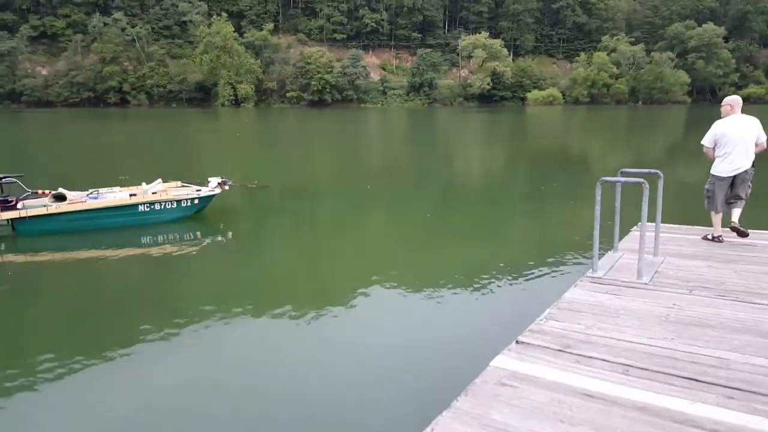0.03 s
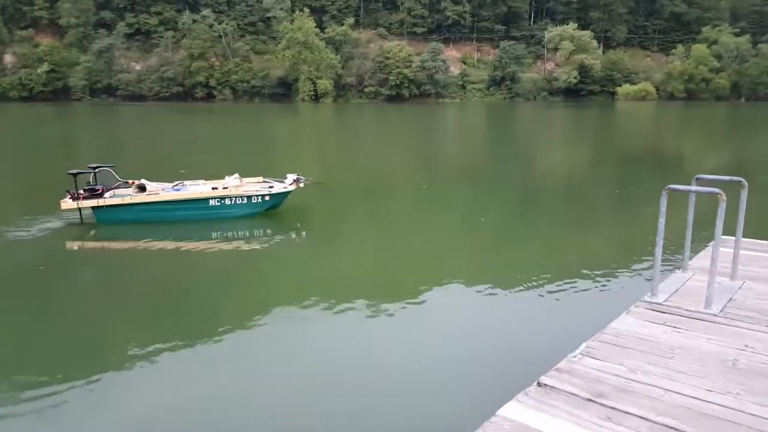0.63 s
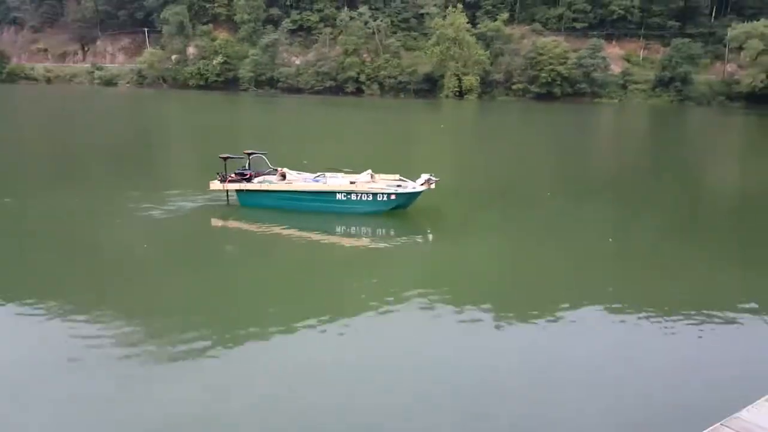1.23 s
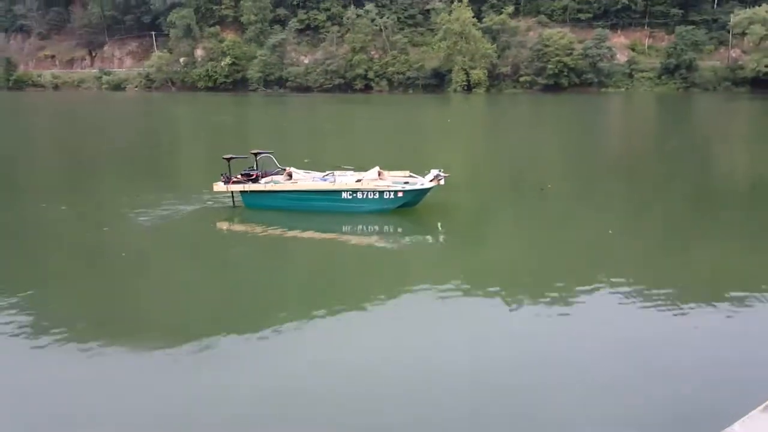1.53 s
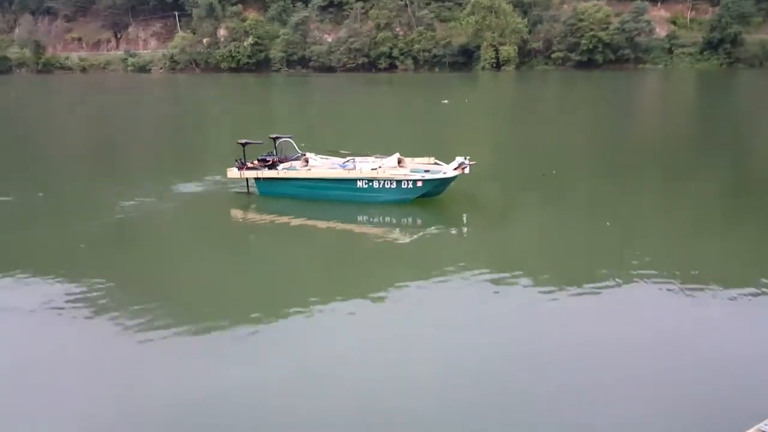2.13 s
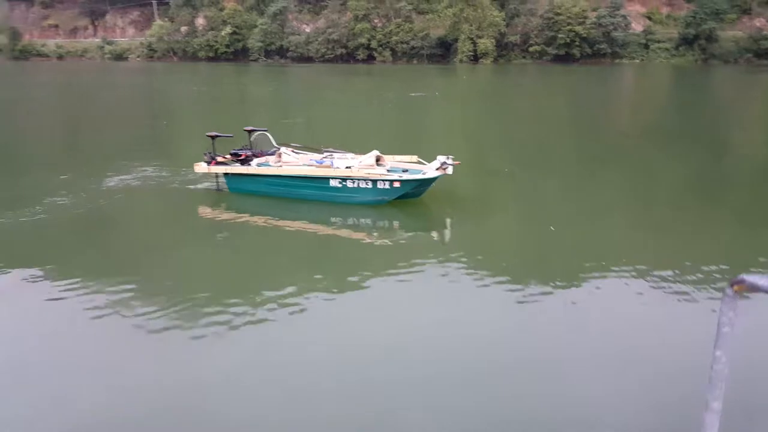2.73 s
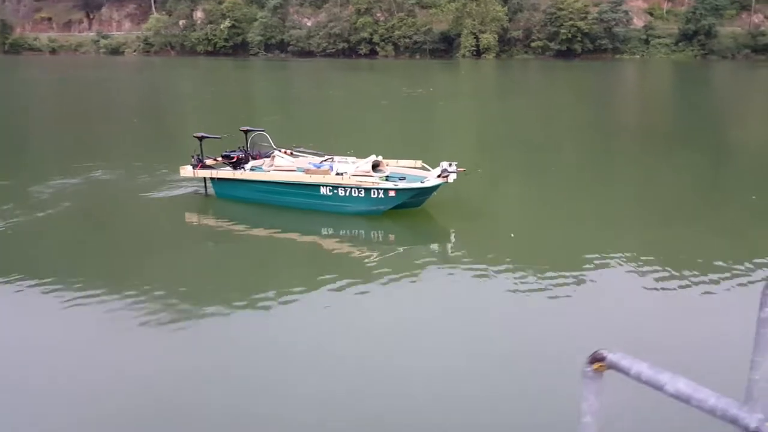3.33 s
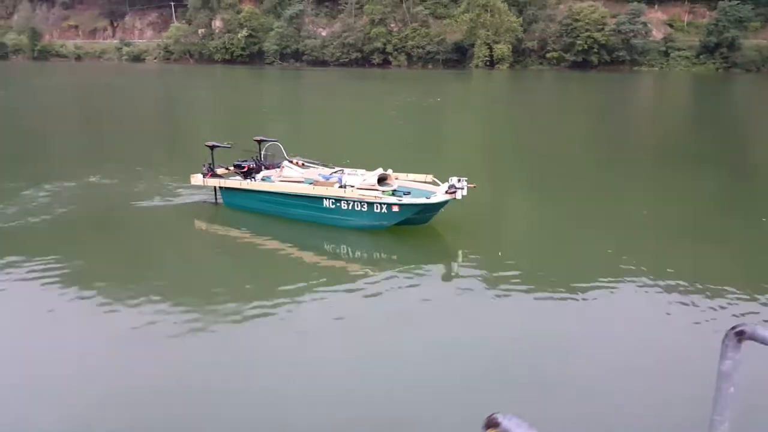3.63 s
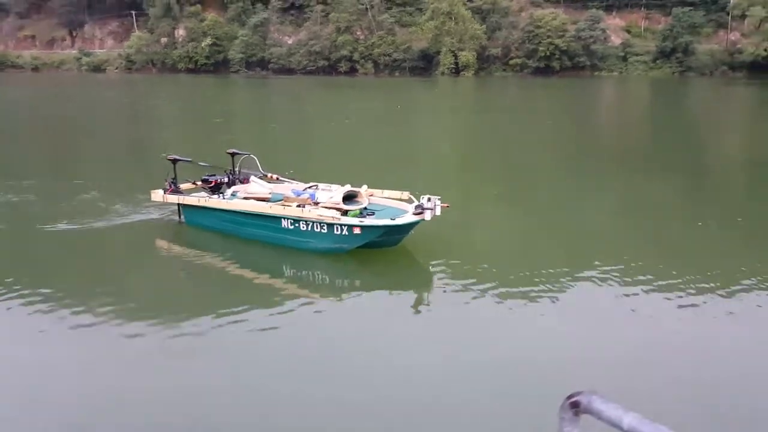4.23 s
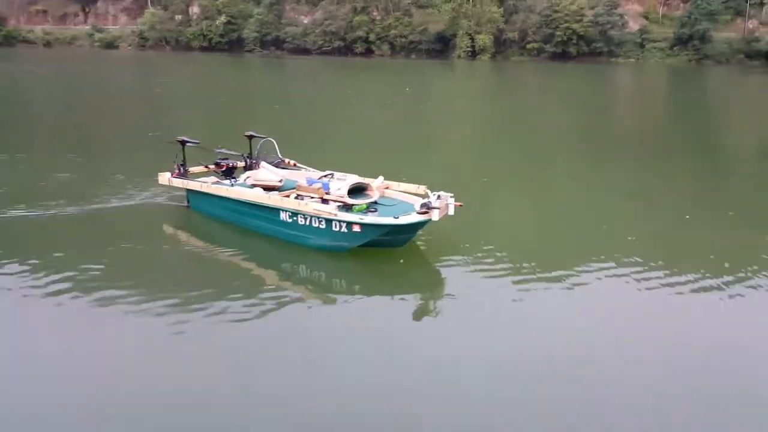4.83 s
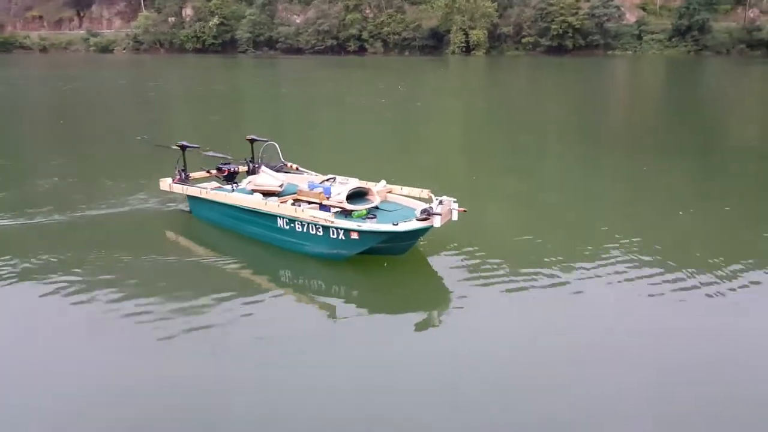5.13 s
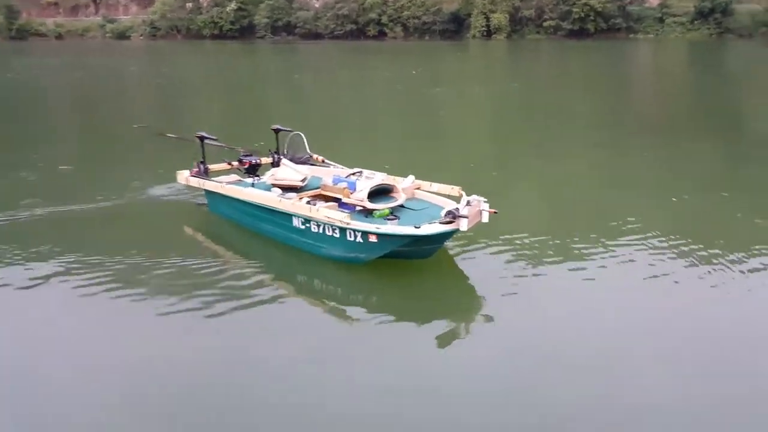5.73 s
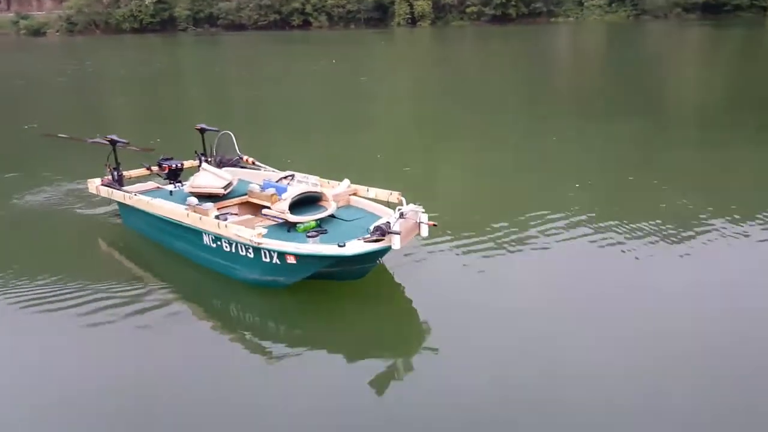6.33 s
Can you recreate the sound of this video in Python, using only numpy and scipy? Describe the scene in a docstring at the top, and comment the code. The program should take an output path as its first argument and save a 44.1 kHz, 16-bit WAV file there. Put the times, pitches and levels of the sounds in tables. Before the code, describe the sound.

Close, uneven thuds and shoe scuffs on dock planks, while far birds twitter faintly in calm lakeside air.

```python
"""Footsteps and knocks, close by, on the planks of a wooden dock beside a calm lake.
Each blow bends a plank (a hollow thud), rings its higher modes (a woody clack) and cracks at the
contact; soles scuff and grit ticks in between. Out on the water a small electric boat hums past.
Far off a bird whistles twice, an insect chirps, and faint twitter and very high chips run through
the outdoor hush. Heard on a stereo pair whose left microphone has more presence."""
import sys
import numpy as np
from scipy import signal
from scipy.fft import rfft, irfft, next_fast_len
from scipy.io import wavfile
from scipy.ndimage import uniform_filter1d

SR = 44100
rng = np.random.default_rng(int(sys.argv[2]) if len(sys.argv) > 2 else 0)


def store_pcm(level_fs):
    """Save levels as 16-bit WAV."""
    pcm = np.round(np.clip(level_fs, -1, 1) * 32767).astype(np.int16)
    wavfile.write(sys.argv[1], SR, np.atleast_2d(pcm).T)


N = 286209
TIME = np.arange(N) / SR
AGE = np.arange(SR // 4) / SR  # seconds since a blow

# Blows on the planks, close by: start_s, strength_db, pitch_hz (of the struck spot), hardness_db
BLOWS = [(0.097, -36, 297, -8), (0.196, -52.5, 353, -20), (0.2559, -46.5, 330, -27),
         (0.3409, -35.5, 255, -11.5), (0.665, -53, 269, -21), (0.755, -59, 296, -5), (0.868, -58, 472, -13),
         (1.066, -48, 302, -12.5), (1.4844, -53, 215, -17), (1.836, -62, 222, 4), (1.908, -62.5, 366, 0.5),
         (2.304, -63.5, 270, -6), (2.507, -60, 520, -34), (2.643, -67, 302, 0), (2.792, -25.5, 345, -4.5),
         (2.848, -45, 288, -17), (3.062, -56, 200, -36), (3.4215, -60, 222, 7), (3.854, -49.5, 443, -10),
         (3.935, -58.5, 378, -8), (4.221, -58.5, 206, 1), (4.306, -64, 330, -2), (4.7216, -56, 288, -8),
         (5.041, -58.5, 330, -17), (5.48, -40.5, 331, -10), (5.563, -56.5, 265, -19),
         (5.763, -45, 327, -11.5), (5.7924, -35, 349, -5), (5.842, -52, 237, -14), (5.91, -53.5, 350, -15),
         (6.1748, -55, 435, -3), (6.207, -54.5, 275, -12), (6.239, -57.5, 272, -7), (6.327, -54, 221, -7)]
# The cracks start on the left and move rightward: time_s, left_minus_right_db
CRACK_PAN = [(0, 3), (3, 2), (5.8, -2)]


def footsteps(plank_hz=308, light_tap_db=-51):
    """Each blow on the dock sounds as a thud, a clack and a crack together."""
    starts, strength_db, pitch_hz, hardness_db = np.transpose(BLOWS)[:, :, None]
    stiffness = np.log2(pitch_hz / plank_hz)
    # stiff spots and hard contacts clack more; heavy blows go more into the thud
    clack_db = -7 + 15.5 * stiffness + 0.29 * hardness_db - 0.15 * (strength_db - light_tap_db)
    sharpness_db = strength_db + hardness_db - np.max(strength_db + hardness_db)  # 0 for the sharpest
    pan_db = np.interp(starts, *np.transpose(CRACK_PAN))
    thuds = plank_thuds(pitch_hz)
    clacks = from_db(clack_db) * plank_clacks(832 * 2 ** (0.24 * stiffness))
    cracks = from_db(hardness_db - 3.5) * contact_cracks(hardness_db, sharpness_db)
    blows = from_db(strength_db) * (thuds + clacks + cracks * from_db([pan_db / 2, -pan_db / 2]))
    out = np.zeros((2, N))
    for k, start in enumerate(starts[:, 0]):
        add(out, start, blows[:, k])
    return out


def plank_thuds(pitch_hz, echo_s=0.015, echo_db=-10, frame_db=-14):
    """The plank gives way in a few swings of sinking pitch and rings on; the frame rumbles after it."""
    cycles = pitch_hz * (AGE + 0.0025 * (1 - np.exp(-AGE / 0.0065)))
    give = unit_blow(np.sin(2 * np.pi * cycles) * decay(t60=0.019, rise=0.004))
    modes = deck_ring(0, 550, pitch_hz, octaves=0.56, rise_cycles=0.99)
    boards = dense_ring(len(BLOWS), 106, 680, t60=0.043, rise=0.00033)
    thuds = unit_blow(modes + 0.43 * give + 0.41 * boards)
    # the bending wave comes back once from the end of the plank
    echo = np.pad(thuds, [(0, 0), (round(echo_s * SR), 0)])[:, :len(AGE)]
    frame = dense_ring(len(BLOWS), 97, 255, t60=0.2, rise=0.018, order=3)
    return unit_blow(thuds + from_db(echo_db) * echo) + from_db(frame_db) * frame


def plank_clacks(centre_hz, tail_db=-16):
    """The plank's higher modes ring briefly; the rail and boards scatter a faint tail."""
    modes = deck_ring(550, 1800, centre_hz, octaves=1.6, rise_cycles=0.49)
    boards = coloured_ring(centre_hz, octaves=1.56, t60=0.032, rise=0.00043)
    tail = dense_ring(len(BLOWS), 440, 1500, t60=0.2, rise=0.0091)
    return unit_blow(modes + 0.95 * boards) + from_db(tail_db) * tail


def contact_cracks(hardness_db, sharpness_db, apart=0.89, rattle_db=-14.5):
    """The contact cracks, brighter when hard, and reaches each microphone partly by its own path."""
    centre_hz = 4170 * 2 ** (0.08 * np.minimum(hardness_db, 0) + 0.39 * from_db(sharpness_db))
    left, right_path = (coloured_ring(centre_hz, octaves=1.3, t60=0.04, rise=0.00071) for _ in range(2))
    left += deck_ring(1800, SR, centre_hz, octaves=0.88, rise_cycles=0.61)
    right = (1 - apart) * left + 2 * apart * right_path
    cracks = unit_blow(band(np.array([left, right]), 1350, 6350, order=5))  # the wood swallows the top
    edge_db = -21.5 + 0.21 * sharpness_db  # sharper blows reach further into the top octaves
    edge = dense_ring(len(BLOWS), 4200, 8700, t60=0.008, rise=0.00024)
    rattle = dense_ring(len(BLOWS), 3350, 5000, t60=0.068, rise=0.0086, order=3)
    return cracks + from_db(edge_db) * edge + from_db(rattle_db) * rattle


# Modes of the deck underfoot: pitch_hz, relative_level_db, t60_s
DECK_MODES = [(122.5, -10, 0.26), (162, -9, 0.25), (193.6, -7.5, 0.13), (234.4, -9, 0.11),
              (263.4, 1, 0.034), (294.2, -3, 0.054), (350, -14.5, 0.078), (383, -4.5, 0.059),
              (418.5, -3, 0.069), (469, -6.5, 0.067), (546.8, -2, 0.047), (658, 1, 0.053), (784, -5, 0.09),
              (884, 0, 0.03), (1012, -1.5, 0.032), (1074, -19, 0.049), (1161, -7.5, 0.029),
              (1395, -7, 0.0416), (1537, -5, 0.04), (2067, 8, 0.014), (2286, -6.5, 0.044),
              (3163, 6.5, 0.02), (3265, -15, 0.025), (3530, 0, 0.015), (3766, 4.5, 0.015),
              (4190, -16.5, 0.053), (4600, -0.5, 0.033), (5120, -2, 0.021), (4990, -3, 0.059)]


def deck_ring(low_hz, high_hz, centre_hz, octaves, rise_cycles):
    """The struck spot favours the deck modes near centre_hz; low modes take longer to build up."""
    hz, level_db, t60 = np.transpose(DECK_MODES)
    rings = np.exp(2j * np.pi * hz[:, None] * AGE) * decay(t60[:, None], rise_cycles / hz[:, None])
    favoured = np.exp(-0.5 * (np.log2(hz / centre_hz) / octaves) ** 2)
    chance = rng.random((len(BLOWS), len(hz), 2))
    strength = from_db(level_db + 3 * chance[..., 0]) * favoured * (hz >= low_hz) * (hz < high_hz)
    phase = np.exp(2j * np.pi * chance[..., 1])
    return unit_blow(((strength * phase) @ rings).real)


def dense_ring(count, low_hz, high_hz, t60, rise, order=2):
    """Countless overlapping modes: a band of noise that dies away, one row per event."""
    noise = rng.standard_normal((count, len(AGE)))
    return unit_blow(band(noise * decay(t60, rise), low_hz, high_hz, order))


def coloured_ring(centre_hz, octaves, t60, rise):
    """A dense ring for each blow, in a band round that blow's own centre."""
    half = 2 ** (octaves / 2)
    return np.vstack([dense_ring(1, hz / half, hz * half, t60, rise, 3) for hz in np.ravel(centre_hz)])


# Small dry ticks on the near boards: start_s, level_db
TICKS = [(1.096, -64.5), (1.336, -61), (1.429, -66), (1.59, -62), (2.094, -58.5), (2.464, -61.5),
         (3.129, -62.5), (3.502, -65), (4.068, -62), (4.917, -68.5), (5.013, -64.5), (5.054, -68),
         (5.104, -65), (5.263, -62), (5.319, -62.5), (5.431, -61.5), (5.617, -61.5), (5.722, -65),
         (6.269, -65), (6.295, -61.5)]


def ticks(body_db=-4, edge_db=-16, grit_db=-72.5, grit_count=26):
    """Dry ticks with a trace of wood under them, and fainter grit at random."""
    when, size = rng.random((grit_count, 2)).T
    grit = np.c_[when * N / SR, grit_db - 2 * np.log(size + 0.05)]
    events = np.vstack([TICKS, grit])
    count = len(events)
    centre_hz = 3240 * 2 ** rng.normal(0, 0.26, count)
    snaps = coloured_ring(centre_hz, octaves=1.48, t60=0.018, rise=0.00036)
    snaps += from_db(edge_db) * dense_ring(count, 8000, 15000, t60=0.005, rise=0.00018)
    snaps += from_db(body_db) * dense_ring(count, 260, 660, t60=0.069, rise=0.00098)
    out = np.zeros(N)
    for (start, db), snap in zip(events, snaps):
        add(out, start, from_db(db) * snap)
    return out


# Soles sliding on the near boards: start_s, length_s, level_db
SCUFFS = [(0.177, 0.074, -54.5), (0.511, 0.12, -53.5), (0.64, 0.11, -62), (0.956, 0.18, -58.5),
          (1.786, 0.15, -65), (6.319, 0.078, -61)]


def scuffs(grain_db=5, hiss_db=-22):
    """A sliding sole catches on the grain: a low rub in the board and a hiss at the surface."""
    pressure = sum(from_db(db) * swell(start, length) for start, length, db in SCUFFS)
    catches = rng.standard_normal((2, N)) * from_db(grain_db * drift(240))
    rub = unit_rms(band(catches[0], 123, 830))
    hiss = unit_rms(band(catches[1], 1000, 8100))
    return pressure * (rub + from_db(hiss_db) * hiss)


def deck_murmur(level_db=-71, uneven_db=3.2, count=42):
    """The boards keep bumping softly, one low mode at a time, as the weight on them shifts."""
    out = np.zeros(N)
    for k, (when, size, pitch) in enumerate(rng.random((count, 3))):
        bump = unit_blow(np.sin(2 * np.pi * 140 * 3 ** pitch * AGE) * decay(t60=0.13, rise=0.0021))
        bump_db = level_db - uneven_db * np.log(size + 0.17)
        add(out, (k + when) / count * N / SR, from_db(bump_db) * bump)
    return out


# The small boat, out on the lake: time_s, level_db
MOTOR_LEVEL = [(1.6, -75), (3.88, -75.5), (4.69, -86), (5.38, -66), (5.53, -78), (6.06, -69.5), (6.45, -72)]


def boat_motor(pitch_hz=232.3, waver_hz=2.52, octave_db=-6.5):
    """The electric motor hums faintly over the water: a wavering tone and its octave."""
    hz = pitch_hz + waver_hz * drift(8)
    level_db = np.interp(TIME, *np.transpose(MOTOR_LEVEL)) + 0.95 * drift(13)
    return from_db(level_db) * (tone(hz) + from_db(octave_db) * tone(2 * hz))


# A far bird's long whistles: start_s, length_s, start_pitch_hz, level_db
WHISTLES = [(0.546, .31, 6440, -56.5), (0.983, 0.13, 6230, -50.5)]
# Its short notes, down and up again: turn_s, lowest_pitch_hz, sweep_hz_per_s, level_db
SWOOPS = [(2.195, 4960, 20500, -61), (2.481, 4730, 130000, -65), (2.895, 4770, 70300, -62),
          (3.296, 6650, 10000, -63.5), (3.612, 5500, 50000, -64.5)]


def bird(sag_hz_per_s=1200, attack_s=0.028, release_s=0.086, bend_s=0.0055, swoop_s=0.046):
    """Two thin, slowly falling whistles, then a few short swooping notes."""
    out = np.zeros(N)
    waver_hz = 15.5 * drift(250)
    for start, length, hz, db in WHISTLES:
        age = np.clip(TIME - start, 0, length)
        envelope = np.minimum(age / attack_s, 1) * np.minimum((length - age) / release_s, 1)
        out += from_db(db) * envelope * tone(hz - sag_hz_per_s * age + waver_hz)
    for turn, hz, sweep, db in SWOOPS:
        lift_hz = sweep * (np.hypot(TIME - turn, bend_s) - bend_s)
        out += from_db(db) * swell(turn - swoop_s / 2, swoop_s) * tone(hz + lift_hz + waver_hz)
    flutter_db = 3.04 * drift(62.5)
    return out * from_db(flutter_db)


def twitter(count, centre_hz, sweep_octaves, turns_per_s, blur_hz, spread_db, overtone_db):
    """Far birds twitter: quick steep swoops, blurred by distance and broken into syllables."""
    out = np.zeros(N)
    for _ in range(count):
        swoop = 2 * np.tanh(uniform_filter1d(drift(turns_per_s), SR // 120) / 2)
        hz = centre_hz * 2 ** (sweep_octaves * swoop) + blur_hz * drift(1500)
        syllables = from_db(spread_db * 2 * np.tanh(drift(60)) - 0.5 * swoop)  # weaker atop each swoop
        out += syllables * (tone(hz) + from_db(overtone_db) * tone(2 * hz))
    return unit_rms(out)


# Flurries of higher twitter in the distance: start_s, length_s
FLURRIES = [(0, 0.99), (5.1, 1.45)]


def far_birds(steady_db=-71, flurry_db=-70.5):
    """Faint twitter runs throughout; at times a higher, more broken one joins in."""
    steady = twitter(count=4, centre_hz=5900, sweep_octaves=0.26, turns_per_s=50,
                     blur_hz=159.7, spread_db=9, overtone_db=-14)
    higher = twitter(count=2, centre_hz=8320, sweep_octaves=0.2, turns_per_s=70,
                     blur_hz=263.5, spread_db=19, overtone_db=-30)
    activity = sum(swell(start, length) for start, length in FLURRIES)
    return from_db(steady_db) * steady + from_db(flurry_db) * activity * higher


# Very high chips, far off: start_s
CHIP_STARTS = [.285, .79, 1.345, 1.75, 2.675, 3.07, 3.55, 4.575, 5.095, 5.82, 6.33]


def high_chips(start_hz=11200, top_hz=14500, glide_s=0.011, level_db=-72.5, tail_db=-8):
    """Each chip flicks upward and leaves a short diffuse tail."""
    hz = top_hz + (start_hz - top_hz) * np.exp(-AGE / glide_s)
    chip = unit_blow(tone(hz) * decay(t60=0.04, rise=0.02))
    tails = dense_ring(len(CHIP_STARTS), start_hz, top_hz, t60=0.23, rise=0.046, order=3)
    out = np.zeros(N)
    for start, tail in zip(CHIP_STARTS, tails):
        add(out, start, chip + from_db(tail_db) * tail)
    return from_db(level_db) * out


def insects(chirp_db=-66.5, every_s=0.154, buzz_db=-70.5, buzz_peak_s=4.3, fade_db_per_s=10):
    """Four high, evenly spaced chirps, and later a thin far buzz that swells and fades."""
    chirp = unit_rms(band(rng.standard_normal(N), 8860, 9060))
    buzz = unit_rms(band(rng.standard_normal(N), 2690, 3070))
    pulses = sum(swell(k * every_s - 0.013, length=0.11) ** 2 for k in range(4))
    buzz_level = from_db(buzz_db - fade_db_per_s * np.abs(TIME - buzz_peak_s))
    return from_db(chirp_db) * pulses * chirp + buzz_level * buzz


# Colour of the open air all round: frequency_hz, relative_density_db
HUSH_SPECTRUM = [(30, -12.5), (70, -15.5), (110, -10.5), (170, 1.5), (240, -3.5), (400, -4), (650, -12),
                 (1400, -13), (2300, -16), (5800, -11.5), (8500, -17.5), (10200, -15), (11500, -23.5),
                 (15500, -27.5)]
# Its slow fall and rise: time_s, level_db (before the trim)
HUSH_LEVEL = [(0.0, -63), (0.61, -62.5), (1.89, -65), (5.14, -66), (5.51, -62), (6.45, -62)]
# How alike it is at the two microphones: frequency_hz, correlation
HUSH_LIKENESS = [(60, 0.57), (250, 0.88), (640, 0.45), (1400, 0.41), (3100, 0.12), (7000, 0), (15000, 0)]


def hush(trim_db=0.66, waver_db=1):
    """Steady air over the lake, alike at both microphones in the bass and wide in the treble."""
    size = next_fast_len(N)
    hz = np.fft.rfftfreq(size, 1 / SR)
    mid, side = rfft(rng.standard_normal((2, size)))
    alike = at_hz(HUSH_LIKENESS, hz)
    pair = np.sqrt(1 + alike) * mid + np.sqrt(1 - alike) * side * [[1], [-1]]
    air = irfft(from_db(at_hz(HUSH_SPECTRUM, hz)) * pair, size)[:, :N]
    level_db = np.interp(TIME, *np.transpose(HUSH_LEVEL)) + trim_db + waver_db * drift(28)
    return unit_rms(air) * from_db(level_db)


def from_db(db):
    """Decibels to gain."""
    return 10 ** (np.asarray(db) / 20)


def unit_rms(x):
    """Scale to rms 1."""
    return x / np.sqrt(np.mean(x ** 2) + 1e-20)


def unit_blow(x):
    """Scale each row to the energy of 30 ms at rms 1."""
    return x / np.sqrt(np.sum(x ** 2, axis=-1, keepdims=True) / (0.03 * SR) + 1e-20)


def at_hz(points, hz):
    """Read a spectrum on a log-frequency axis."""
    known_hz, values = np.transpose(points)
    return np.interp(np.log(np.maximum(hz, 1)), np.log(known_hz), values)


def band(x, low_hz, high_hz, order=2):
    """Causal band-pass."""
    edges_hz = [low_hz, min(high_hz, SR / 2 - 1)]
    return signal.sosfilt(signal.butter(order, edges_hz, "band", fs=SR, output="sos"), x)


def drift(rate_hz):
    """Smooth random wander of rms 1."""
    knots = rng.standard_normal(int(N / SR * rate_hz) + 2)
    return unit_rms(np.interp(TIME * rate_hz, np.arange(len(knots)), knots))


def decay(t60, rise):
    """Envelope that builds up and dies away; both times in seconds."""
    return (1 - np.exp(-AGE / rise)) * from_db(-60 * AGE / t60)


def swell(start, length):
    """A rounded bump in time."""
    return np.sin(np.pi * np.clip((TIME - start) / length, 0, 1))


def tone(hz):
    """A sine of rms 1 that follows a pitch curve."""
    return np.sqrt(2) * np.sin(2 * np.pi * np.cumsum(hz) / SR)


def add(out, start, sound):
    """Mix a sound in at its time."""
    i = max(round(start * SR), 0)
    out[..., i:i + sound.shape[-1]] += sound[..., :max(N - i, 0)]


def round_the_casing(pair, turn_hz=3250, width_hz=1300):
    """Sound reaches the right microphone round the casing, which turns the phase of its treble."""
    b, a = signal.iirnotch(turn_hz, turn_hz / width_hz, fs=SR)
    return np.array([pair[0], signal.lfilter(2 * b - a, a, pair[1])])  # all-pass


def scene():
    """The dock close by, the boat and wildlife far off, the hush all round."""
    dock = footsteps() + ticks() + scuffs() + deck_murmur()
    # narrow planks radiate little deep bass
    dock = signal.sosfilt(signal.butter(3, 108, "high", fs=SR, output="sos"), dock)
    wildlife = bird() + far_birds() + high_chips() + insects()
    return round_the_casing(dock + boat_motor() + wildlife) + hush()


# The left microphone hears more presence: frequency_hz, left_minus_right_db
MIC_BALANCE = [(60, 1), (700, 3), (1300, 2), (2400, 9.5), (4400, 8.5), (6300, 7.5), (8100, 1),
               (10000, -2.5), (14000, 1)]


def record(dry, cutoff_hz=15800):
    """The two microphones differ in colour; the top is cut steeply."""
    size = next_fast_len(N + SR // 10)
    tilt_db = at_hz(MIC_BALANCE, np.fft.rfftfreq(size, 1 / SR)) / 2
    coloured = irfft(rfft(dry, size) * from_db([tilt_db, -tilt_db]), size)[:, :N]
    return signal.sosfilt(signal.ellip(10, 0.1, 80, cutoff_hz, fs=SR, output="sos"), coloured)


dry = scene()
out = record(dry)
store_pcm(out)
```